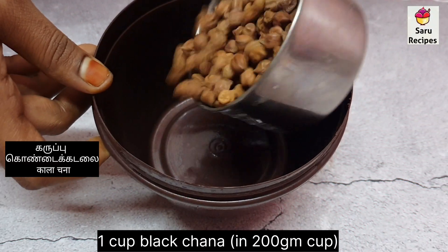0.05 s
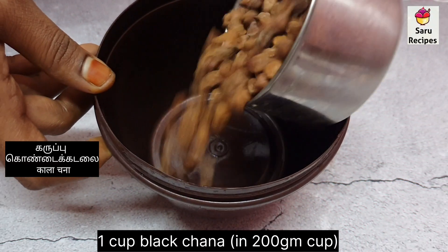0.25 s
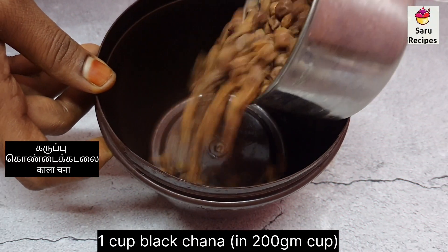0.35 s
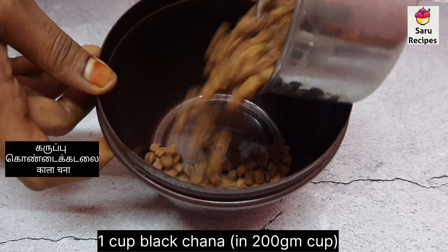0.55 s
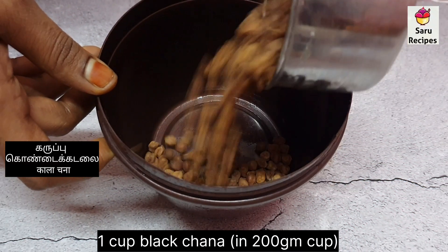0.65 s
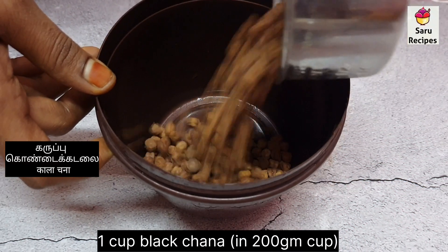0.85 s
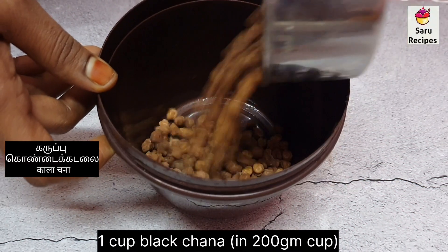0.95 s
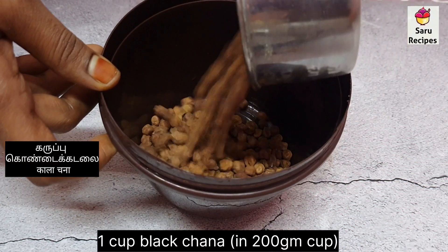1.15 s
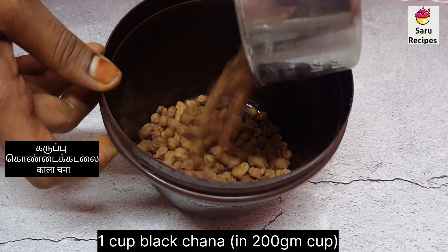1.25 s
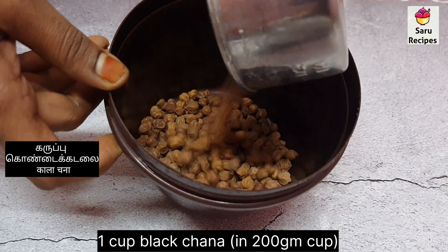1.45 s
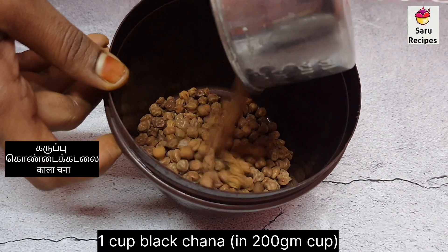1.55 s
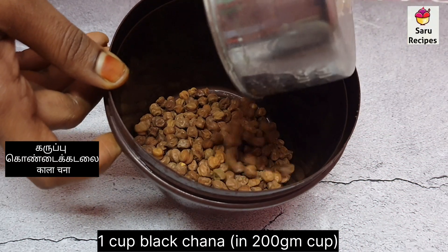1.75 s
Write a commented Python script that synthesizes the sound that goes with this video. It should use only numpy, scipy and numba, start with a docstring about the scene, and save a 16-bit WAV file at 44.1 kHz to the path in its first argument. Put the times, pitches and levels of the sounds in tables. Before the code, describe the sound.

Dried chickpeas pour into a plastic bowl close to the microphone. A faint slide on steel leads to a dense clatter with hollow knocks, which fades to a few light clicks over soft kitchen room noise.

```python
"""Dried chickpeas pour from a steel cup into a hard plastic bowl on a kitchen counter.
Sliding peas excite the cup's high modes; each impact radiates a brief broadband click.
The first peas crack against the bare wall and clumps knock on the base. The growing heap damps
the lowest modes, leaving a pea-on-pea rattle that thins to single drops. The held bowl rumbles
softly, and the room adds short reverberation and steady noise."""
import sys
import numpy as np
from scipy import signal
from scipy.fft import rfft, irfft
from scipy.io import wavfile
from numba import njit

SR = 44100
rng = np.random.default_rng(int(sys.argv[2]) if len(sys.argv) > 2 else 0)


def store_wav(level_fs):
    """Save 16-bit WAV to argv[1]."""
    pcm = np.round(np.clip(np.atleast_2d(level_fs), -1, 1) * 32767)
    wavfile.write(sys.argv[1], SR, pcm.T.astype(np.int16))


N = 79380
T = np.arange(N) / SR


def amp(db):
    """Decibels as an amplitude ratio."""
    return 10 ** (np.asarray(db) / 20)


def pan(db):
    """Level difference: channel gains with the left louder by db."""
    return amp(np.array([[db], [-db]]) / 2)


def unit(x):
    """Normalisation to unit mean energy per channel."""
    return x / np.sqrt(np.mean(np.sum(x ** 2, axis=-1)))


def convolve(x, response):
    """Linear filtering by an impulse response."""
    return signal.fftconvolve(np.atleast_2d(x), np.atleast_2d(response), axes=-1)[:, :N]


def fade(t60):
    """Exponential decay by 60 dB in t60 seconds."""
    return np.exp(-np.log(1000) * T[:int(t60 * SR)] / t60)


def colour(spectrum, size=2048):
    """Minimum-phase response of a spectrum, by folding its cepstrum."""
    hz, db = np.array(spectrum, float).T
    bins_hz = np.fft.rfftfreq(size, 1 / SR)
    gain = amp(np.interp(np.log(bins_hz + 1), np.log(hz), db))
    cepstrum = irfft(np.log(gain))
    cepstrum[1:size // 2] *= 2
    cepstrum[size // 2 + 1:] = 0
    return irfft(np.exp(rfft(cepstrum)))


def blows(table, gain_db):
    """Discrete impulses as times and amplitudes."""
    times, levels = np.array(table).T
    return np.array([times, amp(levels + gain_db)])


def shower(table, column, spread_db, count):
    """Shot noise: random impulses whose mean power follows a level curve."""
    curve = np.array(table)
    slots = (np.arange(count) + rng.uniform(-2, 2, count)) % count
    times = slots / count * N / SR
    sizes = amp(spread_db * np.clip(rng.standard_normal(count), -2, 2))
    sizes = unit(sizes) * np.sqrt(N) * rng.choice([-1, 1], count)
    envelope = amp(np.interp(times, curve[:, 0], curve[:, column]))
    return np.array([times, sizes * envelope])


def clicks(hits, spectrum):
    """Contact transients: brief noise bursts, each different because peas differ in shape."""
    times, sizes = hits
    decay = fade(t60=0.024)[:1024]
    bursts = rng.standard_normal((len(times), 2, len(decay))) * decay
    response = colour(spectrum, size=512)[None, None]
    grains = unit(signal.fftconvolve(bursts, response, axes=-1))
    out = np.zeros((2, 2 * N))
    for start, size, grain in zip(np.clip(times * SR, 0, N).astype(int), sizes, grains):
        out[:, start:start + grain.shape[1]] += size * grain
    return out[:, :N]


@njit
def resonate(starts, poles, sizes, length):
    """Superposition of damped complex oscillations, one per impact."""
    out = np.zeros(N, np.complex128)
    for k in range(len(starts)):
        phasor = sizes[k] + 0j
        for i in range(max(starts[k], 0), min(starts[k] + length, N)):
            out[i] += phasor
            phasor *= poles[k]
    return out


def covered(times, start_s=0.48, full_s=1.108):
    """Fraction of the base under the heap, rising linearly."""
    return np.clip((times - start_s) / (full_s - start_s), 0, 1)


def ring(hits, modes, left_lead_rad, detune, signed):
    """Modal synthesis: each strike rings the modes at slightly different, random pitches."""
    times, sizes = hits
    starts = (times * SR).astype(int)
    out, energy = 0, 0
    for (hz, bare_db, covered_db, t60), lead in zip(modes, left_lead_rad):
        spot, jitter = rng.standard_normal((len(times), 2)).T
        gain = amp(bare_db + covered(times) * (covered_db - bare_db))
        struck_hz = hz * (1 + detune * jitter)
        poles = np.exp((2j * np.pi * struck_hz - np.log(1000) / t60) / SR)
        drive = sizes * gain * (np.sign(spot) if signed else 1)  # the spot struck sets the polarity
        tone = resonate(starts, poles, drive, int(t60 * SR))
        out += np.array([(tone * np.exp(1j * lead)).imag, tone.imag])
        energy += np.mean(gain ** 2) * np.sum(fade(t60) ** 2) / 2
    return out / np.sqrt(energy)


# peas sliding along the cup (time [s], level [dB])
CUP_SLIDE = [(0, -47), (.09, -44.5), (.11, -39.5), (.18, -49), (1.1, -32.5), (1.45, -38.5), (1.58, -40),
             (1.8, -44)]
# peas tapping the cup (time [s], relative level [dB])
CUP_IMPACTS = [(.0135, -43), (.1023, -40), (1.58, -43)]
# modes of the cup (frequency [Hz], relative level [dB])
STEEL_MODES = [(7370, 2), (7850, 8.5), (8150, 6.5), (11278, -3)]
# spectrum of a tick on steel (frequency [Hz], relative level [dB])
SCRAPE_SPECTRUM = [(500, -10), (6500, -11.5), (8500, 1.5), (15500, -5)]


def cup():
    """Frictional excitation: sliding peas tick on the steel and set its modes shimmering."""
    slide = shower(CUP_SLIDE, column=1, spread_db=6, count=1100)
    hits = np.hstack([blows(CUP_IMPACTS, gain_db=33.7), slide])
    t60 = 0.067
    modes = [(hz, db, db, t60) for hz, db in STEEL_MODES]
    left_lead_rad = rng.uniform(0, np.pi, len(modes))
    shimmer = ring(hits, modes, left_lead_rad, detune=0.008, signed=True)
    return shimmer + amp(2) * clicks(hits, SCRAPE_SPECTRUM)


# rumble of the held bowl (time [s], level [dB])
RUMBLE_LEVELS = [(0, -53.5), (.08, -40.5), (.17, -59), (.7, -57), (.88, -36), (.99, -46.5), (1.22, -41),
                 (1.45, -69)]
# spectrum of the rumble (frequency [Hz], relative level [dB])
RUMBLE_SPECTRUM = [(25, -17), (90, 6.5), (300, -35)]


def handling():
    """Structure-borne noise: the held bowl rumbles as it shifts on the counter."""
    rumble = convolve(rng.standard_normal((2, N)), unit(colour(RUMBLE_SPECTRUM)))
    envelope = amp(np.interp(T, *np.array(RUMBLE_LEVELS).T))
    return envelope * rumble * pan(10)


# spectrum of the kitchen's noise (frequency [Hz], relative level [dB])
AMBIENT_SPECTRUM = [(25, -10), (70, 0), (250, -2), (480, -9), (900, -1), (4000, -32), (15500, -15.5)]


def ambience():
    """Stationary room noise, partly coherent between the channels."""
    noise = (rng.standard_normal((2, N)) + rng.standard_normal(N)) / np.sqrt(2)
    return amp(-44) * convolve(noise, unit(colour(AMBIENT_SPECTRUM))) * pan(-2)


# the falling stream (time [s], pea-on-pea level [dB], wall level [dB], base level [dB])
POUR_LEVELS = [(0, -43.5, -49.5, -48.5), (.214, -41.5, -44, -49), (.232, -29, -49, -36),
               (.3, -21.5, -24, -34.5), (.42, -21.5, -26, -34), (.53, -21, -22.5, -39),
               (.6, -24.5, -40.5, -34.5), (.76, -20, -27, -27), (.81, -23.5, -39, -34),
               (.9, -20.5, -34, -24), (1.08, -26, -32, -25.5), (1.22, -26, -33.5, -38.5),
               (1.38, -31, -39.5, -37), (1.46, -36.5, -45, -55), (1.5, -35.5, -47.5, -44.5),
               (1.62, -39, -41, -48.5), (1.8, -36.5, -62, -54)]
# single peas striking the bowl (time [s], relative level [dB])
PEA_CRACKS = [(.2045, -11.5), (.221, -15), (.2246, -8), (.2482, -15), (.2553, -3), (.2937, -12),
              (.3335, -10.5), (.4018, -10.5), (.504, -11.5), (.531, -14), (.5832, -10.5), (.6746, -9),
              (.8248, -12.5), (1.0682, -19), (1.3677, -18), (1.4894, -18.5), (1.522, -21), (1.537, -21),
              (1.671, -27.5), (1.7086, -23)]
# clumps striking the base (time [s], relative level [dB])
CLUMP_KNOCKS = [(.2937, -8.5), (.3348, -13.5), (.3653, -14), (.4551, -11), (.4773, -9.5), (.5163, -9),
                (.5278, -8), (.5594, -2), (.5737, -24), (.6262, -10.5), (.674, -7.5), (.6992, -4.5),
                (.7102, -6.5), (.7618, -6.5), (.767, -13.5), (.7734, -18), (.7851, -6), (.8245, -11.5),
                (.8509, -6), (.8826, -5), (.8989, -5.5), (.9165, -12), (.9475, -11), (.9607, -12),
                (.993, -11.5), (.9986, -8.5), (1.0066, -10.5), (1.197, -19), (1.0543, -18), (1.0981, -23),
                (1.236, -16.5), (1.366, -19), (1.4785, -18.5)]
# spectrum of a pea's click (frequency [Hz], relative level [dB])
CLICK_SPECTRUM = [(280, -35.5), (500, -7), (1400, -5.5), (1900, 2), (2900, -1), (3700, -4), (4700, -4.5),
                  (6500, -7), (15500, -14.5)]


def pea_contacts():
    """Impact noise: short, hard contacts with the bowl or other peas radiate broadband clicks."""
    rattle = shower(POUR_LEVELS, column=1, spread_db=1.5, count=1300)
    hits = np.hstack([blows(PEA_CRACKS, gain_db=16), blows(CLUMP_KNOCKS, gain_db=8.5), rattle])
    return clicks(hits, CLICK_SPECTRUM) * pan(-0.5)


# modes of the wall (frequency [Hz], bare gain [dB], covered gain [dB], T60 [s])
WALL_RESONANCES = [(1143, -12, -12.5, 0.063), (1592, -7.5, -31, 0.031), (1930, 3, 5.5, 0.0027),
                   (1916, 2.5, 2, 0.015), (2063, -26, -3.5, 0.03), (2286, -5.5, -1, 0.022),
                   (2807, 3.5, 0.5, 0.0049), (3037, -4, -26, 0.035), (3425, -2, 3.5, 0.0077),
                   (4664, -13, -9.5, 0.064)]


def bowl_wall():
    """Free vibration: the plastic wall rings briefly after each bounce."""
    patter = shower(POUR_LEVELS, column=2, spread_db=6, count=500)
    hits = np.hstack([blows(PEA_CRACKS, gain_db=14), blows(CLUMP_KNOCKS, gain_db=8.5), patter])
    left_lead_rad = np.pi * rng.uniform(0.33, 1, len(WALL_RESONANCES))
    return ring(hits, WALL_RESONANCES, left_lead_rad, detune=0.02, signed=True) * pan(10)


def cut(x, hz, kind):
    """Steep Butterworth low-pass or high-pass filtering."""
    return signal.sosfilt(signal.butter(7, hz, kind, fs=SR, output="sos"), x)


# modes of the base (frequency [Hz], bare gain [dB], covered gain [dB], T60 [s])
BASE_RESONANCES = [(357, -3, -43, 0.18), (398.4, -1, -28, 0.081), (494, -4.5, -5.5, 0.039),
                   (610, 0, 0, 0.028), (679, 1.5, 6.5, 0.035), (740.4, 5.5, 9, 0.029), (790, -9, -21, 0.02)]


def bowl_base():
    """Granular damping: the base's hollow knocks lose their depth as the heap covers it."""
    patter = shower(POUR_LEVELS, column=3, spread_db=4, count=600)
    hits = np.hstack([blows(CLUMP_KNOCKS, gain_db=14), patter])
    left_lead_rad = [0.36] * len(BASE_RESONANCES)
    body = ring(hits, BASE_RESONANCES, left_lead_rad, detune=0.04, signed=False)
    body = cut(body, 910, "lowpass")
    bare = cut(body, 342.4, "highpass")
    damped = cut(body, 569, "highpass")
    heap = covered(T) ** 2
    return (np.sqrt(1 - heap) * bare + heap * damped) * pan(2.5)


def kitchen(direct):
    """Reverberation: diffuse reflections add a short, slightly dull tail."""
    decay = fade(t60=0.29)
    onset = np.minimum(T[:len(decay)] / 0.0015, 1)
    tail = rng.standard_normal((2, N))[:, :len(decay)] * decay * onset
    tail = signal.lfilter(*signal.butter(1, 8100, fs=SR), tail)
    return direct + amp(-9.5) * convolve(direct, unit(tail))


def scene():
    """Superposition of the reverberant pour, the rumble and the room noise."""
    pour = bowl_base() + bowl_wall() + pea_contacts() + cup()
    return kitchen(pour) + handling() + ambience()


# treble loss of the right microphone, which faces away (frequency [Hz], gain [dB])
OFF_AXIS_RESPONSE = [(6200, -1), (7200, -9.5), (8100, -13), (10000, -9.5)]


def record(dry):
    """Directivity dulls the right channel; saturation rounds the peaks; a low-pass cuts the top."""
    heard = np.vstack([dry[:1], convolve(dry[1], colour(OFF_AXIS_RESPONSE))])
    rounded = heard / (1 + heard ** 4) ** (1 / 4)
    lowpass = signal.ellip(10, .2, 80, 15750, fs=SR, output="sos")
    return signal.sosfilt(lowpass, rounded)


dry = scene()
out = record(dry)
store_wav(out)
```